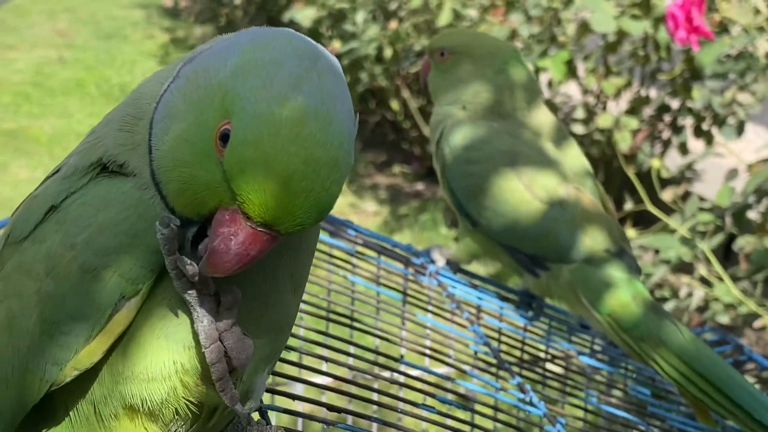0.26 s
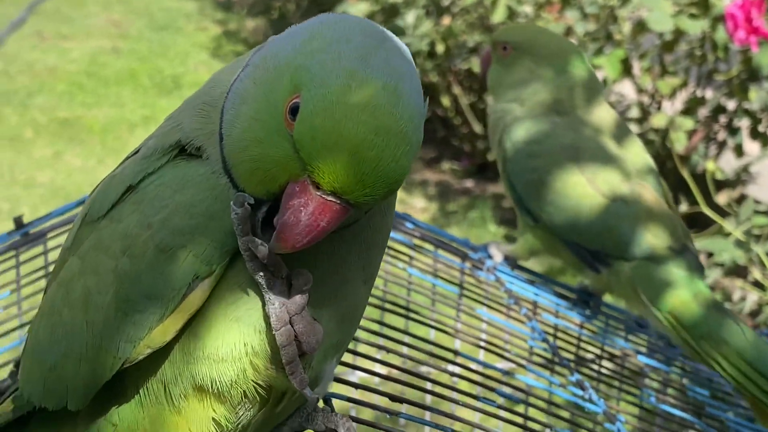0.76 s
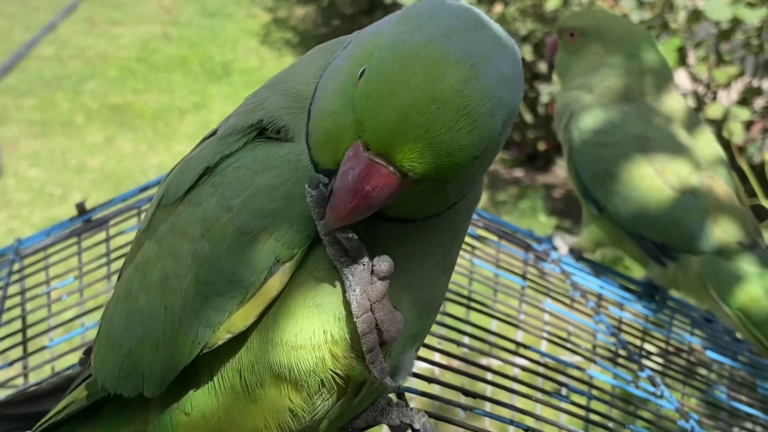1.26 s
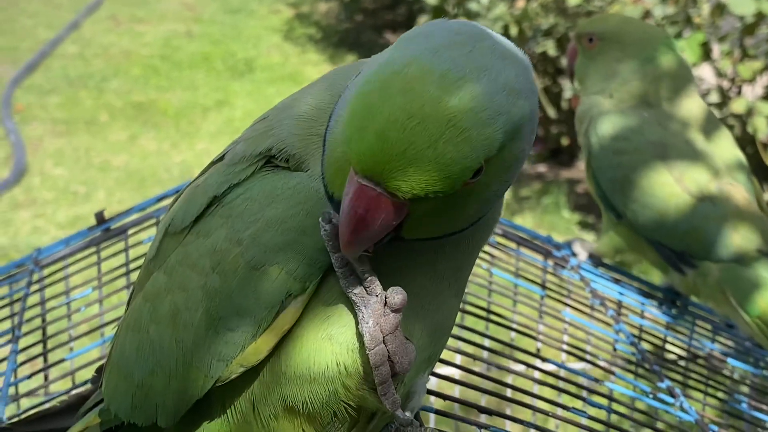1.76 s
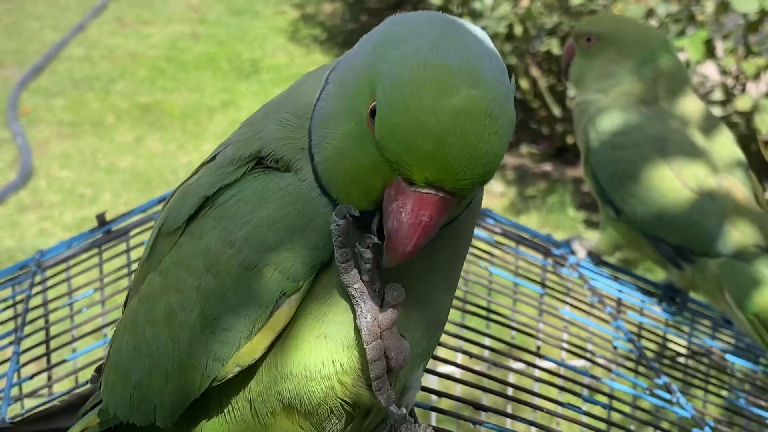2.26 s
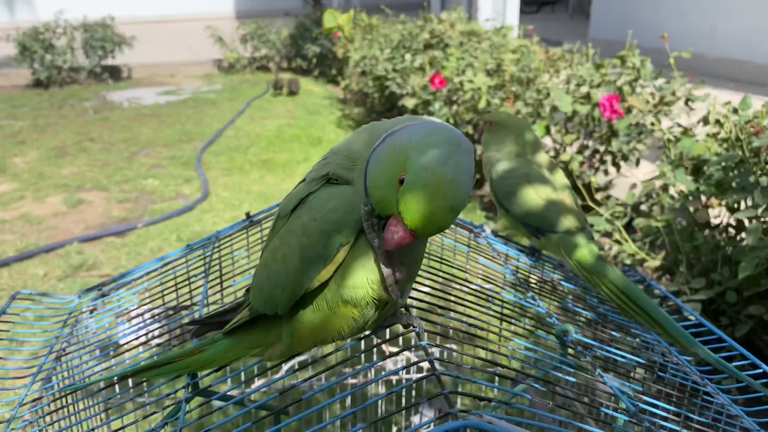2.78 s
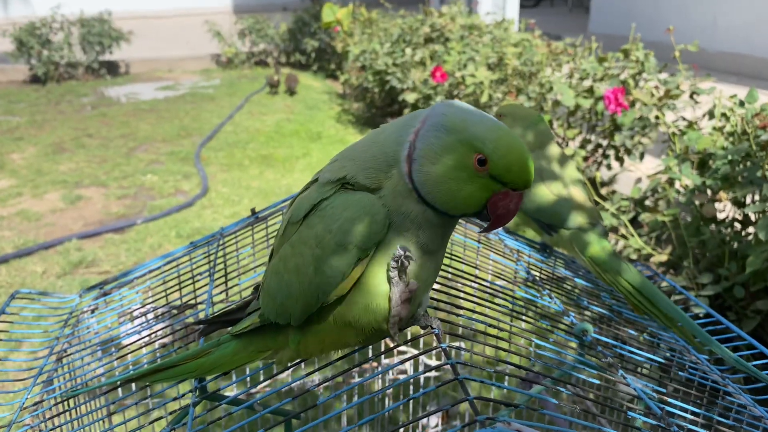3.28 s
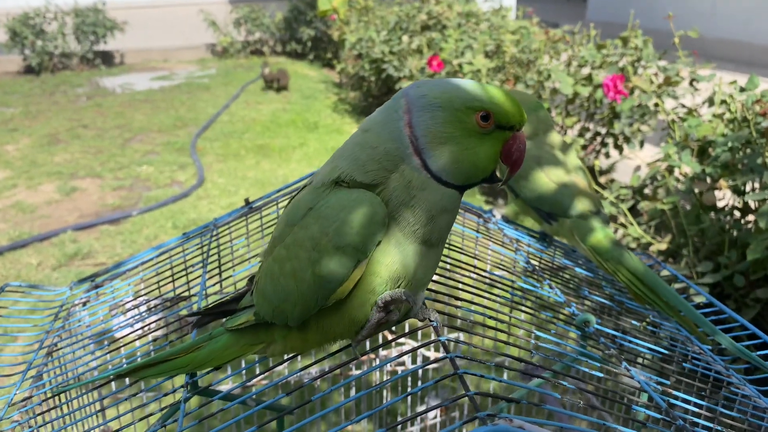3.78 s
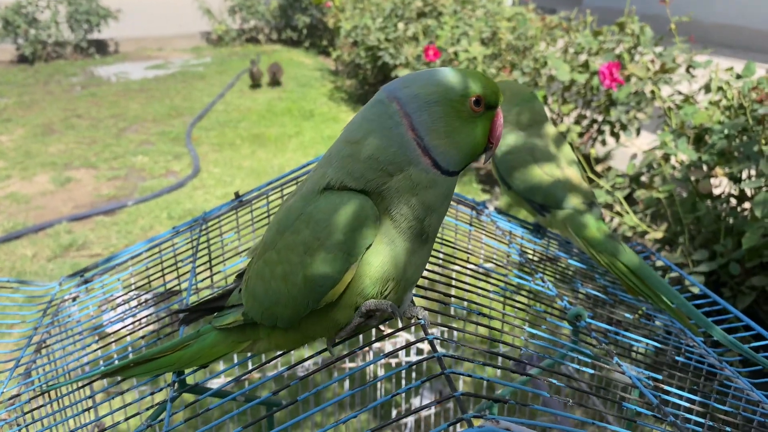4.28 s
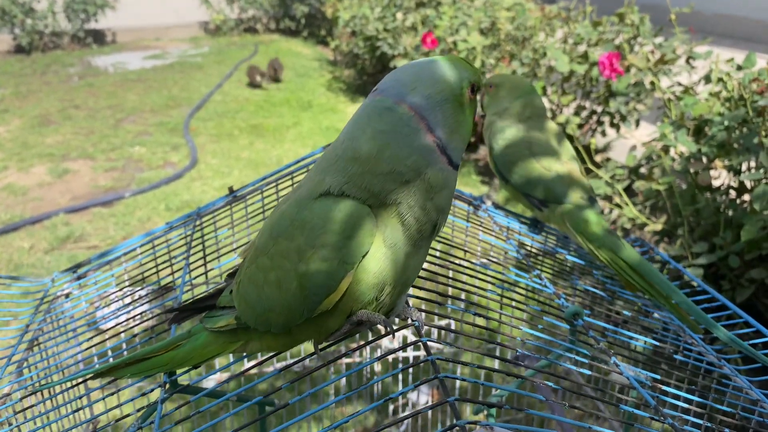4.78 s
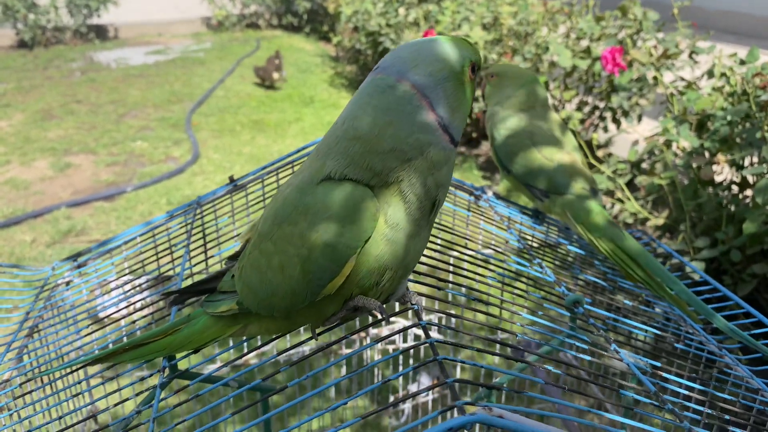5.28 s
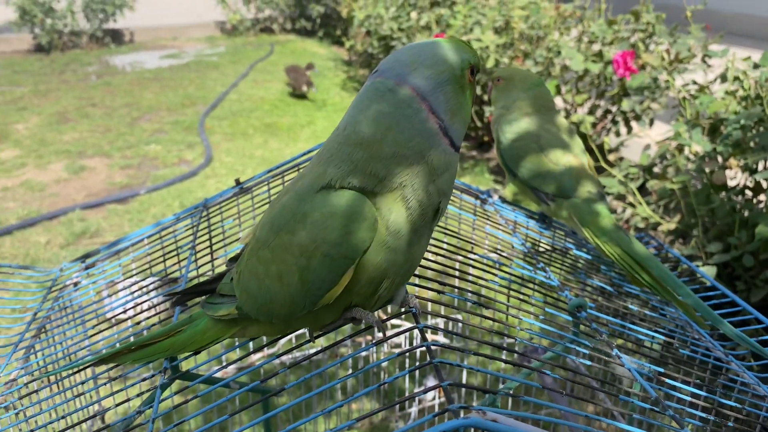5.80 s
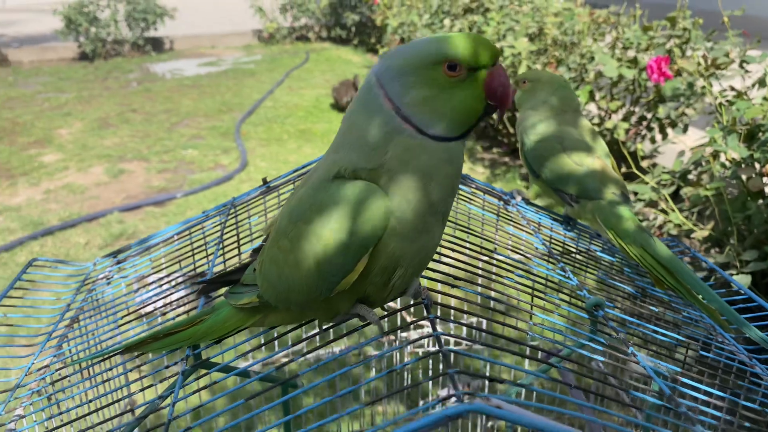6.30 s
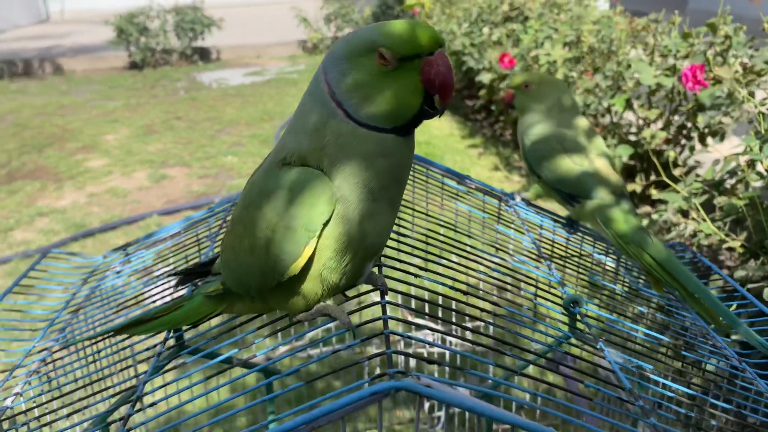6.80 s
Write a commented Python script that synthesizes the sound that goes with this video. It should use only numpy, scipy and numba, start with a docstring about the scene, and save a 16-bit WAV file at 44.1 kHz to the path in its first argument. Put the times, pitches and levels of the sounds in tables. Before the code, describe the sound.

In a walled garden, a phone microphone a few metres from a pet parakeet picks up low, uneven wind rumble, a faint town hum, thin leaf rustle and barely audible peeps from distant birds. At about 0.5 and 0.85 seconds the parakeet gives two short, shrill screeches, each scooping up and sliding down, with strong wall echoes. After a gap, another pair comes at 2.2 and 2.6, with soft wind pops around 2.3. Near 2.7 the narrow stereo image opens wide. Louder, rougher, fluttering pairs follow at 3.5 and 3.8, then slightly lower ones at 4.5 and 4.75, and 5.4 and 5.75, with more echo again. Dull wind thumps cluster between 3.4 and 5.4. The last pair, at 6.5 and 6.8, is strong, harsh and direct, its short echo fading into the quiet garden by 7 seconds.

```python
"""A parakeet screeches six pairs of arched calls in a walled garden, a few metres from a phone.
Each call is a gliding tone with overtones, throbbed by a second membrane and roughened by air noise; walls echo it.
Behind it, low noise and falling pops are wind on the microphone ports, and shaped noise is a distant town hum,
leaves and small birds peeping far off.
The phone starts zoomed in with a narrow stereo image, then widens; its gain control ducks under loud sound."""
import sys
import numpy as np
from scipy import signal
from scipy.fft import rfft, irfft, next_fast_len
from scipy.io import wavfile
from scipy.ndimage import uniform_filter1d
from numba import njit

SR = 44100
rng = np.random.default_rng(int(sys.argv[2]) if len(sys.argv) > 2 else 0)


def put_to_file(sound):
    """Save the sound as 16-bit audio at rate SR, in the file named by the first command-line argument."""
    columns = np.atleast_2d(sound).T  # one column per channel
    safe = np.clip(columns, -1, 1)
    whole_steps = np.round(safe * 32767)
    wavfile.write(sys.argv[1], SR, whole_steps.astype(np.int16))


N = 310905

# Distant town hum over time. Each row: time in seconds, level in dB.
TOWN_LEVEL = [(0.0, -54), (6.2, -47), (7.05, -52)]
# Tone of the town hum. Each row: frequency in Hz, relative density in dB per Hz.
TOWN_SPECTRUM = [(120, -0.5), (250, 11.5), (420, 3.5), (700, 0), (1100, -2.5), (1900, -10), (3000, -17)]
# Tone of the leaves. Each row: frequency in Hz, relative density in dB per Hz.
LEAVES_SPECTRUM = [(1200, -6), (2500, 2.5), (4000, -4), (6500, -9), (8500, -22), (11500, -17),
                   (12500, -62.5)]
# Faint small birds far off. Each row: start in seconds, length in seconds, pitch in Hz, width in Hz,
# level in dB before its fade.
FAR_PEEPS = [(.13, .3, 2930, 60, -66), (1.7, .25, 7300, 300, -66), (2.1, .2, 6900, 400, -66),
             (4.17, .16, 11400, 250, -72), (4.83, .05, 1390, 50, -56), (5.0, .18, 11500, 200, -71),
             (6.26, .1, 9600, 200, -74)]
# Wind on the ports. Each row: time in seconds, level of the low rumble in dB, upper rumble above it in dB.
WIND_LEVEL = [(0.0, -41, -2), (0.12, -49, 4.5), (0.53, -39.5, -5), (1.94, -37.5, -3), (3.42, -40.5, -3),
              (3.63, -32.5, -7.5), (3.73, -43.5, 0), (4.83, -35, -1), (5.1, -55.5, 6.5), (5.42, -47, -3.5),
              (5.65, -58, 7.5), (5.77, -52.5, -2.5), (6.36, -47.5, 8), (6.77, -57.5, 16), (6.87, -40, 0),
              (7.05, -62, 18)]
# Gust pops. Each row: start in seconds, level in dB before its envelope.
GUST_POPS = [(2.281, -36), (2.368, -28.5), (3.29, -50.5), (3.427, -34), (3.901, -30.5), (4.315, -37),
             (4.617, -33), (4.801, -35.5), (4.868, -34), (5.035, -34.5), (5.388, -38.5), (5.933, -32),
             (6.439, -34)]
# The screeches; the bird faces away at first, so its echoes are strong.
# Each row: start in seconds, length in seconds, climb in seconds, fall in seconds, top in Hz,
# end pitch aimed for in Hz, lateness of climb and of fall (exponents on time, 1 = even),
# share of the arch that sags away steadily (0-1), fundamental, 2nd harmonic and higher harmonics in dB,
# push of the overtones on the way down in dB, flutter depth (0-1), echo of near walls in dB.
CALLS = [(0.474, 0.26, 0.068, 0.15, 2585, 1866, 1.29, 2.88, 0.37, -28.5, -36.0, -37.5, 7.5, 0.07, 1.5),
         (0.84, 0.22, 0.059, 0.11, 2501, 1759, 1.34, 1.52, 0.0, -30.5, -37.0, -37.5, 5, 0.09, 3.0),
         (2.215, 0.25, 0.067, 0.14, 2424, 1784, 1.58, 2.54, 0.01, -28.5, -36.5, -37.5, 9, 0.1, 1),
         (2.578, 0.21, 0.067, 0.09, 2411, 1711, 0.87, 1.75, 0.28, -25.5, -32.5, -34.0, 6.0, 0.1, -2.5),
         (3.507, 0.21, 0.062, 0.13, 2458.0, 1885, 1.23, 2.66, 0.18, -20.5, -22.5, -24.5, 9, 0.28, -12),
         (3.817, 0.2, 0.064, 0.095, 2507.0, 1735, 1.41, 1.07, 0.0, -20.5, -25.0, -27.0, 0.5, 0.28, -12),
         (4.464, 0.2, 0.084, 0.15, 2241, 1503, 1.11, 0.79, 0.29, -23.0, -29.0, -30.5, 5.0, 0.27, -5.5),
         (4.756, 0.21, 0.072, 0.089, 2285, 1683.0, 1.2, 1.22, 0.37, -22.0, -26.5, -30.0, 2, 0.25, -8.5),
         (5.437, 0.22, 0.11, 0.16, 2061, 1522, 0.87, 0.6, 0.7, -23.0, -29.0, -31.5, 5.0, 0.22, -5.5),
         (5.757, 0.206, 0.095, 0.088, 2177, 1668, 0.98, 0.82, 0.7, -22.5, -28, -30.5, 1.5, 0.19, -5.5),
         (6.473, 0.2, 0.089, 0.11, 2324, 1686, 0.93, 1.15, 0.7, -18.5, -22.5, -22.5, 4.0, 0.24, -15.5),
         (6.778, 0.19, 0.069, 0.089, 2306, 1712, 1.15, 1.05, 0.02, -21.5, -24.5, -25.0, 1.5, 0.18, -15)]
# How the throat favours each part as the pitch moves.
# Each row: pitch in Hz, fundamental in dB, 2nd harmonic in dB, higher harmonics in dB.
VOICE_BALANCE = [(600.0, 4, 1, 19.5), (1200.0, -9, 4, 1.5), (1590, -10.5, 6.5, -4), (1713, -9, 8, -2.5),
                 (1938, -6.5, 2.5, 0.5), (2152, -6.0, -2, -2.5), (2194, 1, 1.5, -0.5),
                 (2550.0, -7.5, 1, -0.5)]
# Harmonics 3 to 8 at the syrinx, one relative level in dB each.
SYRINX_DB = [2, 5, -1.5, 3, 3, 0.5]
# Throat, beak and microphone on the higher harmonics. Each row: frequency in Hz, gain in dB.
THROAT_GAIN = [(1500, -2), (2700, 15.5), (5000, 7.5), (7000, 3.5), (9500, 6), (10600, 1.5), (12200, -8.5),
               (13200, -45.5), (14800, -23), (16500, -15.5)]
# Ports towards the bird, zoomed in. Each row: frequency in Hz, left leads in radians, left minus right in dB.
NARROW_PORTS = [(2010, 1.5, -1), (2540, -0.1, 0), (5760, 1.82, 0.5), (6730, -18.5, -5), (6970, 2.5, 0.5),
                (8780, 2, 1), (9820, 1, -0.5), (10400, -31.5, 1), (12960, 3, -3), (12400, -2.5, 2.5)]
# The same when wide. Each row: frequency in Hz, left leads in radians, left minus right in dB.
WIDE_PORTS = [(1000, 0.17, 1.5), (2280, 1.17, -1), (3400, 2.184, 0.5), (5050, 2.34, -5.5),
              (6080, 4.49, -1.5), (7120, 4, -9), (8400, 3.53, 18), (9230, 8.68, -3.5), (10200, 7.8, 0),
              (11700, 8, -1), (12600, 4.6, -0.5)]

ZOOM_OUT_START_S, ZOOM_OUT_END_S = 2.644, 2.81
LEAVES_DB = -63.5
POP_DROP_HZ = 484
START_HZ, SETTLE_S = 534.3, .0209  # every call scoops up from here
ROUND_S = .014  # inertia that rounds the corners of the pitch arch
SWELL_DB, SWELL_S = -29.5, 0.023  # effort starts this low and catches up
FADE_DB_PER_S, CLOSE_S = 150, 0.026  # on the held end note; final closing
FLUTTER_RATIO = .165  # the second membrane beats at this share of the pitch
RASP_DB, SCRATCH_DB = -16, -15  # against the overtones, against the loudest fundamental
JITTER_RAD, FLICKER_DB = .07, 2.5  # spread of the uneven cycles; of the overtone levels
NEAR_SPAN_S, GARDEN_T60_S, WASH_T60_S = .016, 1.05, 0.31  # spread of quick echoes; decay of tail and wash
GARDEN_DB, FAR_WALL_DB, WASH_DB = -18.5, -24, -12.5  # against the sound sent; the first two before leaves dull them
FAR_WALL_S = 0.1096
LIMIT_DB, LIMIT_RATIO, ATTACK_S, RELEASE_S = -17, 5.2, 0.0089, 0.14
TOP_HZ = 15800
SIDES = np.array([[1], [-1]])  # left, right
T = np.arange(N) / SR
SIZE = next_fast_len(N + SR)


def undb(db):
    """Amplitude factor for a level in dB."""
    return 10 ** (np.asarray(db) / 20)


def level(x, db):
    """Scale a signal to this rms level."""
    return x * undb(db) / np.sqrt(np.mean(x ** 2))


def on_log(hz, table, order=1):
    """A table column read at these frequencies, straight on a log scale."""
    table = np.array(table, float)
    return np.interp(np.log(np.maximum(hz, 1)), np.log(table[:, 0]), table[:, order])


def filtered(x, gain):
    """Apply a complex gain given as a function of frequency."""
    freqs = np.arange(SIZE // 2 + 1) * SR / SIZE
    return irfft(rfft(x, SIZE) * gain(freqs), SIZE)[..., :N]


def band(hz, width, channels=1):
    """Noise in a bell-shaped band, rms 1."""
    noise = rng.standard_normal((channels, N))
    return level(filtered(noise, lambda f: np.exp(-((f - hz) / width) ** 2)), 0)


def walk(rate):
    """Random levels held 1 / rate s and slewed twice; spread near 1."""
    hold = int(SR / rate)
    steps = np.repeat(rng.standard_normal(N // hold + 1), hold)
    return 1.32 * uniform_filter1d(uniform_filter1d(steps, hold), hold)[:N]


@njit
def follow(x, attack, release):
    """Envelope that rises fast and falls slowly."""
    y, e = np.empty(len(x)), 1e-6
    for i in range(len(x)):
        e += (x[i] - e) * (attack if x[i] > e else release)
        y[i] = e
    return y


def zoom():
    """0 while zoomed in, 1 when wide."""
    return np.interp(T, [ZOOM_OUT_START_S, ZOOM_OUT_END_S], [0, 1])


def hiss(spectrum, side):
    """Octave bands of noise that each flicker a little, shaped to a spectrum, rms 1."""
    out = 0
    for hz in 110 * 2. ** np.arange(8):
        mid, wide = band(hz, hz / 2, channels=2)
        stereo = mid + side * min(hz / 550, 1) * wide * SIDES  # lows stay near the middle
        out = out + undb(1.2 * walk(3.8)) * np.sqrt(hz) * stereo
    lowest, highest = spectrum[0][0], spectrum[-1][0]
    return level(filtered(out, lambda f: undb(on_log(f, spectrum)) * (f > lowest) * (f < highest)), 0)


def town_hum():
    """Distant town: broad noise, its level drifting; the zoom narrows it."""
    s, db = np.transpose(TOWN_LEVEL)
    return undb(np.interp(T, s, db)) * hiss(TOWN_SPECTRUM, 0.73 + .5 * zoom())


def leaves():
    """Leaves as brighter noise, plus a faint treble band that the zoom lifts."""
    rustle = undb(LEAVES_DB) * hiss(LEAVES_SPECTRUM, 0.18 + 0.91 * zoom())
    return rustle + undb(-85 - 7.2 * zoom()) * band(9750, 2000)


def far_birds():
    """Small birds far off: narrow bands of noise that start quickly and fade evenly."""
    out = 0
    for at, length, hz, width, db in FAR_PEEPS:
        t = (T - at) / length
        out = out + undb(db) * band(hz, width) * np.clip(t * 8, 0, 1) * np.clip(1 - t, 0, 1)
    return out


def wind():
    """Low buffeting, mostly shared by both ports, with sudden falling pops."""
    s, db, upper_db = np.transpose(WIND_LEVEL)
    low, high = band(58.5, 27, channels=2), band(113.3, 87.3, channels=2)
    low = low[0] + undb(-11) * low[1] * SIDES
    high = high[0] + undb(-10) * high[1] * SIDES
    upper = undb(np.interp(T, s, upper_db) + 1.5 * walk(25)) * high
    out = undb(np.interp(T, s, db)) * (low + upper)
    t = T[:int(.04 * SR)]
    glide = 130 + POP_DROP_HZ * np.exp(-t / 0.0038)
    envelope = np.exp(-t / 0.017) * np.minimum(t / 0.0033, 1)
    pop = np.sin(2 * np.pi * np.cumsum(glide) / SR) * envelope
    for at, db in GUST_POPS:
        i = int(at * SR)
        out[:, i:i + len(t)] += undb(db + 1.3 * SIDES) * pop  # the wind hits the left port harder
    return out


def garden(x, send):
    """Near walls and ground give quick echoes, a far wall a late one, the garden a long thin tail."""
    t = T[:SR]
    near = np.zeros(SR)
    delay, sign = rng.random((12, 2)).T
    near[(SR * (.001 + NEAR_SPAN_S * delay)).astype(int)] = np.sign(sign - .5) * np.exp(-delay / 0.25)
    near = near / np.linalg.norm(near)

    tail = rng.standard_normal((2, SR)) * undb(-60 * t / GARDEN_T60_S) * np.minimum(t / 0.011, 1)
    tail = (tail[0] + 0.69 * tail[1] * SIDES) / np.linalg.norm(tail[0])
    wall = rng.standard_normal(SR) * np.exp(-((t - FAR_WALL_S) / 0.0084) ** 2)
    late = undb(GARDEN_DB) * tail + undb(FAR_WALL_DB) * wall / np.linalg.norm(wall)
    late = filtered(late, lambda f: 1 / (1 + (f / 5000) ** 2))[:, :SR]  # leaves swallow the treble

    # bright short scatter from bushes and walls
    wash = rng.standard_normal((2, SR)) * undb(-60 * t / WASH_T60_S)
    late = late + undb(WASH_DB) * (wash[0] + .7 * wash[1] * SIDES) / np.linalg.norm(wash[0])
    quick_echoes = signal.fftconvolve(send, near)[:N]
    return x + quick_echoes + signal.fftconvolve((0.039 * x + send)[None], late)[:, :N]


def ports(x, table):
    """The two ports hear the bird with a phase and level gap that depends on frequency."""
    def gain(f):
        share = 2 / (1 + undb(-2 * SIDES * on_log(f, table, order=2)))
        return np.sqrt(share) * np.exp(.5j * SIDES * on_log(f, table))
    return filtered(x, gain)


def arch(t, climb, fall, top_hz, end_hz, climb_late, fall_late, sag):
    """Pitch scoops up to the end note, with a hump on top of it; also how far the fall has come, 0-1."""
    falling = np.clip((t - climb) / fall, 0, 1)
    down = falling ** fall_late
    away = 1 - np.clip(t / climb, 0, 1) ** climb_late + down  # distance from the top of the hump
    scoop = end_hz - (end_hz - START_HZ) * np.exp(-t / SETTLE_S)
    hump = (top_hz - end_hz) * np.cos(np.pi / 2 * away) ** 2 * (1 - sag * falling)
    return scoop + uniform_filter1d(hump, int(ROUND_S * SR), mode="nearest"), down


def overtones(phase, hz, strain, flicker):
    """Harmonics 3 to 8 weighted by syrinx and throat; three wavers of level are shared among them."""
    k = np.arange(3, 9)[:, None]
    db = on_log(k * hz, THROAT_GAIN) + np.array(SYRINX_DB)[:, None] - 2.37 * (k - 3) * (1 - strain)
    weight = undb(db) * (k * hz < TOP_HZ)
    weight = weight / np.sqrt(np.sum(weight ** 2, axis=0))
    weight = weight * undb(FLICKER_DB * flicker[k[:, 0] % 3])
    return np.sum(weight * np.sin(k * phase + k), axis=0)


def screech(row, shimmer, air):
    """An arched tone with overtones; a slower second membrane throbs it, adding side lines, and air rasps."""
    start, length, climb, fall, top_hz, end_hz, climb_late, fall_late, sag = row[:9]
    db, second_db, upper_db, push_db, flutter, _ = row[9:]
    span = slice(int(start * SR), int((start + length) * SR))
    t = T[span] - start
    pitch_waver, beat_waver, level_waver, jitter, second_flicker = shimmer[:5, span]
    hz, down = arch(t, climb, fall, top_hz, end_hz, climb_late, fall_late, sag)

    effort_db = SWELL_DB * np.exp(-t / SWELL_S) - FADE_DB_PER_S * np.clip(t - climb - fall, 0, 1)
    db = db + effort_db + on_log(hz, VOICE_BALANCE, order=1)
    second_db = second_db + effort_db + on_log(hz, VOICE_BALANCE, order=2) + push_db * down
    second_db = second_db + FLICKER_DB * second_flicker
    upper_db = upper_db + effort_db + on_log(hz, VOICE_BALANCE, order=3) + .5 * push_db * down

    phase = 2 * np.pi * np.cumsum(hz * (1 + 0.0047 * pitch_waver)) / SR
    strain = np.clip((hz - 1500) / 600, 0, 1)  # the second membrane joins in only high in the arch
    beat = FLUTTER_RATIO * phase + .5 * beat_waver
    # the beat also bends the fundamental, which favours its upper side line
    bend = .6 * flutter * strain * np.cos(beat)
    phase = phase + JITTER_RAD * jitter  # uneven cycles thicken the overtones most
    tone = undb(db) * np.sin(phase - bend) + undb(second_db) * np.sin(2 * phase + 1)
    tone += undb(upper_db) * overtones(phase, hz, strain, shimmer[5:8, span])
    throb = 1 + flutter * strain * np.sin(beat) + 0.03 * level_waver
    edges = np.clip(np.minimum(t / 0.0022, (length - t) / CLOSE_S), 0, 1)

    # turbulent air goes with the overtones, and scratches most before the tone has settled
    rasp = undb(RASP_DB + upper_db - 3.1 * strain) * air[0, span]
    scratch = undb(SCRATCH_DB + np.max(db)) * np.exp(-t / 0.028) * air[1, span]
    out = np.zeros(N)
    out[span] = edges * (np.sqrt(2) * throb * tone + rasp + scratch)
    return out


def parakeet():
    """All calls, direct and echoed by the garden, heard by ports that change with the zoom."""
    shimmer = np.array([walk(rate) for rate in (150, 60, 900, 1100, 90, 90, 90, 90)])
    # air noise is brighter than the tone
    noise = rng.standard_normal(N)
    rasp = level(filtered(noise, lambda f: undb(on_log(f, THROAT_GAIN)) * f ** 1.53), 0)
    air = np.array([rasp, band(2730, 800)[0] + undb(-22.5) * rasp])
    calls = [screech(row, shimmer, air) for row in CALLS]
    send = sum(undb(row[-1]) * call for call, row in zip(calls, CALLS))
    heard = garden(sum(calls), send)
    return (1 - zoom()) * ports(heard, NARROW_PORTS) + zoom() * ports(heard, WIDE_PORTS)


def scene():
    """The garden from its far background to the bird."""
    return town_hum() + leaves() + far_birds() + wind() + parakeet()


def record(dry):
    """Gain control turns everything down while the sound is loud; deep bass and top are cut."""
    dry = signal.sosfilt(signal.butter(4, 40, "high", fs=SR, output="sos"), dry)
    rms = np.sqrt(uniform_filter1d(np.mean(dry ** 2, axis=0), 200).clip(0))
    loud = follow(rms, 1 / (ATTACK_S * SR), 1 / (RELEASE_S * SR))
    gain = np.minimum(undb(LIMIT_DB) / loud, 1) ** (1 - 1 / LIMIT_RATIO)
    return signal.sosfilt(signal.ellip(8, .2, 70, TOP_HZ, fs=SR, output="sos"), dry * gain)


dry = scene()
out = record(dry)
put_to_file(out)
```